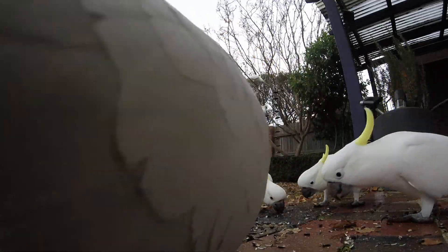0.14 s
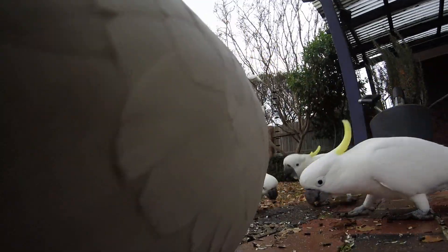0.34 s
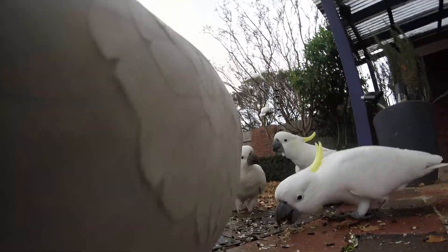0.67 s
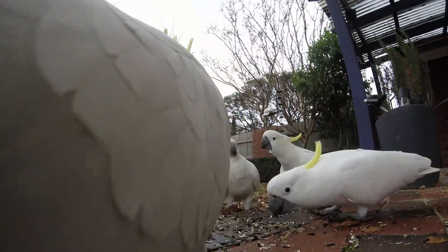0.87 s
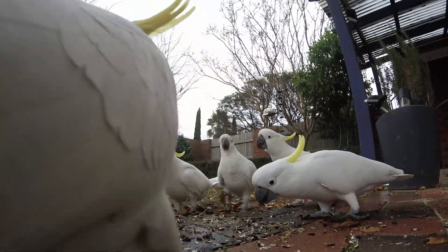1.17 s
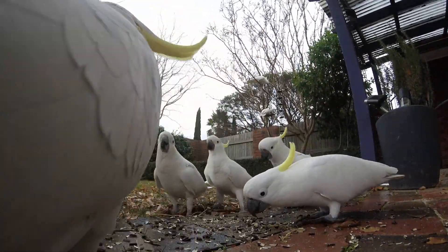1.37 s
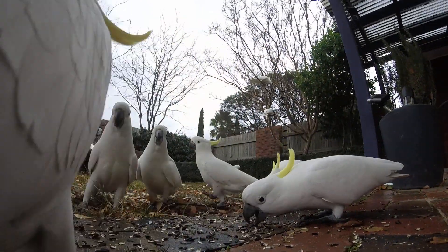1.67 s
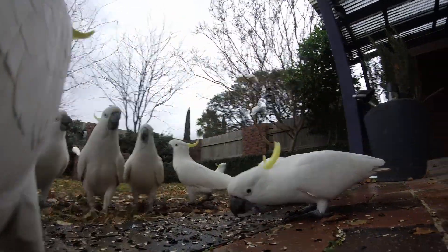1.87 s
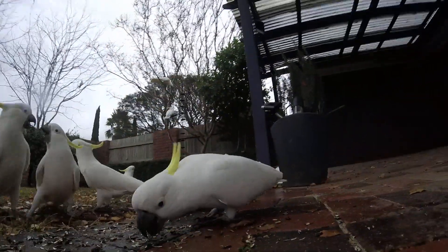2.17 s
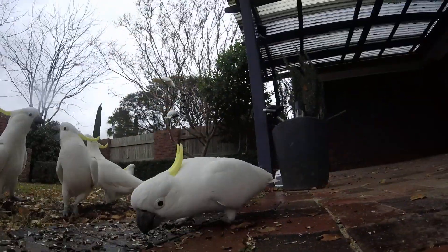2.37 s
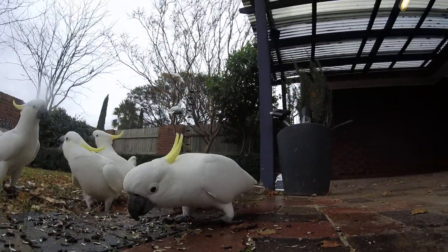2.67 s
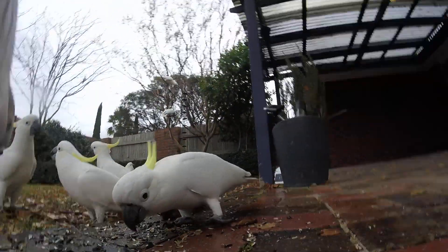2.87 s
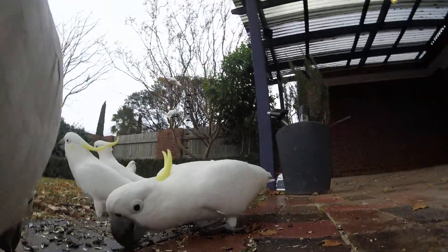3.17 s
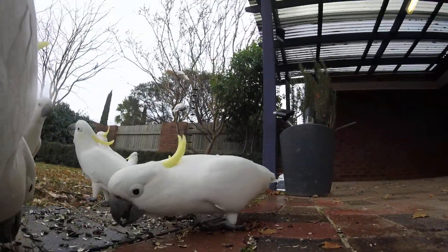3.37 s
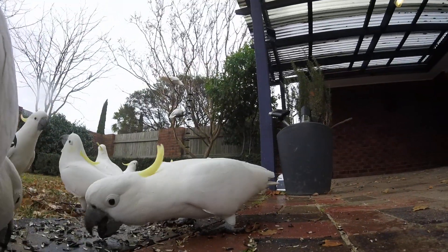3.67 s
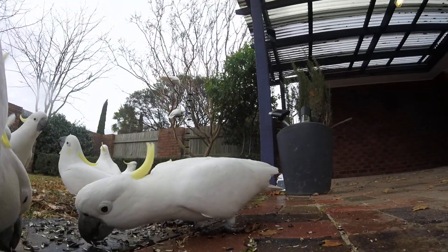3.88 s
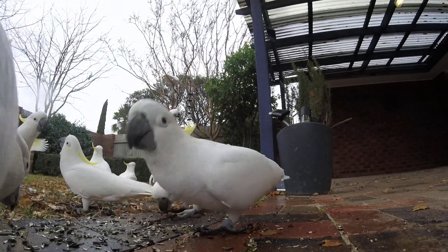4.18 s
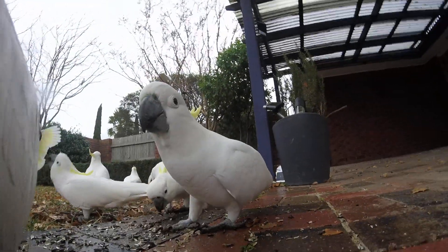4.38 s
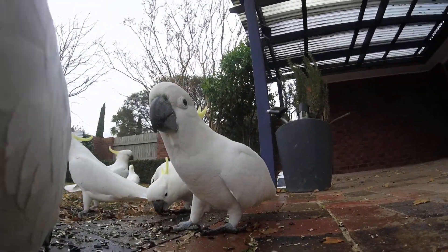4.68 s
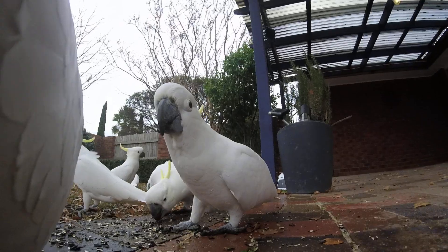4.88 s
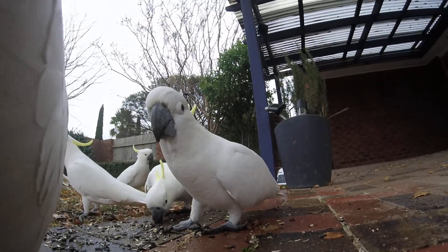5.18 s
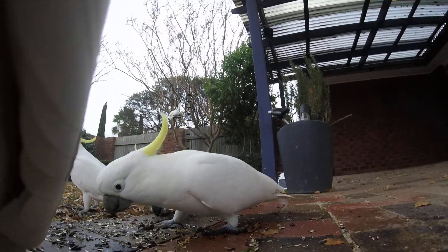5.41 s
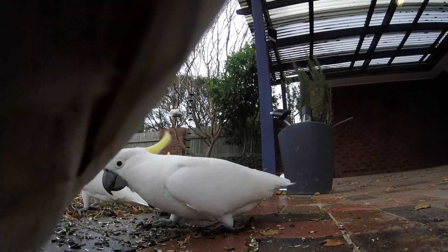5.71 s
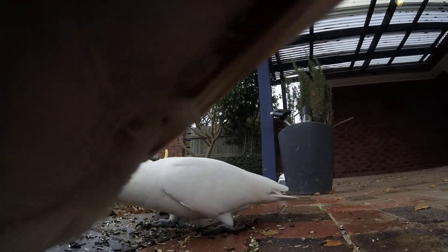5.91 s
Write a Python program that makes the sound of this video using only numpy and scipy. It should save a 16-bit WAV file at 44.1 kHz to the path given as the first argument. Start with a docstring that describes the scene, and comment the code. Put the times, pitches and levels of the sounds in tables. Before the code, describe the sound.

A quiet, steady, muffled hiss of garden air runs throughout, heard from inside a small sealed plastic housing on paving where large parrots feed. After near-stillness, faint taps and a light brush arrive at 0.4-0.7 s. At 0.87 s a loud, hard, hollow plastic knock lands with a low thump, followed by small clicks. Little ticks lead to rubbing at 1.6 s and a second loud knock at 1.72 s. From about 1.9 to 2.4 s comes the busiest passage: continuous gritty scuffing with rattling taps, bright husk cracks and dull bumps. A lighter knock follows at 2.65 s, sharp short scrapes at 3.0-3.3 s, and a bumpy tap near 3.36 s. Then it thins: small taps at 3.5-3.8 s, a lull, soft scratchy strokes with crisp ticks at 4.4-4.7 s, a low bump at 4.9 s, faint brushing and clicks around 5.0-5.4 s, and gentle thuds at 5.6 and 5.87 s.

```python
"""A steady muffled hiss comes first: garden air through the sealed plastic housing of a small camera.
Large parrots feeding on seed on wet paving then knock and rub it: beaks and feet excite its modes
by impact, feathers and grit by random slips. Husks crack nearby as very short impulses, and hops
and rocking of the camera are low damped oscillations. The hiss is noise shaped by a spectrum."""
import sys
import numpy as np
from scipy import signal
from scipy.io import wavfile
from scipy.ndimage import uniform_filter1d

SR = 44100
rng = np.random.default_rng(int(sys.argv[2]) if len(sys.argv) > 2 else 0)


def boost(x):
    """Linear amplitude factor 10**(x/20) for a level x in decibels (scalar or array-like)."""
    u = np.asarray(x, float) / 20
    return 10 ** u


def master_out(mix):
    """Clip the mix to full scale and print it as 16-bit PCM to the path in sys.argv[1]."""
    frames = np.transpose(np.atleast_2d(mix))
    ceiling = np.clip(frames, -1, 1)
    pcm = np.round(ceiling * 32767).astype(np.int16)
    wavfile.write(sys.argv[1], SR, pcm)


N = 266805  # length in samples

# Modes of the housing walls in flexure: f/Hz, relative level/dB, t60/s
WALL_MODES = [(440, 3.5, 0.042), (471, 6, 0.016), (578, -17, 0.056), (1048, 0, 0.014)]
# Modes of the back shell: f/Hz, relative level/dB, t60/s
SHELL_MODES = [(790, -25.5, 0.008), (865, -8.5, 0.021), (1155, -5, 0.061), (1373, 6.5, 0.04),
               (1594, 6, 0.012), (1802, 6, 0.011), (1957, 5, 0.015)]
# Modes of the door and lens port: f/Hz, relative level/dB, t60/s
PORT_MODES = [(2160, 7.5, 0.021), (2426, 12.5, 0.019), (2723, 14.5, 0.013), (3217, 17, 0.0038),
              (3414, 9.5, 0.011), (3680, 1, 0.012), (4020, -5, 0.02), (4120, 0, 0.016)]
# Modes of the mount, lurching and flexing: f/Hz, relative level/dB, t60/s
MOUNT_MODES = [(62, 8, 0.045), (256.3, 0, 0.039), (278.5, -0.5, 0.071), (358, -6, 0.051), (600, -24, 0.092)]
# Blows on the housing: t/s, nominal peak level of the tap/dB,
# lean/dB (positive weakens the back shell, negative the port), nominal peak level of the mount's lurch/dB
KNOCKS = [(0.3958, -46, -1, -45), (0.5469, -40, -18, -32.5), (0.5612, -34, -3, -36.5),
          (0.5852, -37, -1, -60), (0.5988, -42, -3, -49), (0.8681, -11.5, -4, -7), (0.9104, -44, -16, -37),
          (0.9247, -35, -14, -64), (0.9324, -28, -13.5, -65), (0.956, -59, 4, -29), (0.9714, -34, -19, -31),
          (0.9893, -44, -2, -59), (1.484, -53, 4, -39.5), (1.61, -44, 1, -60), (1.636, -31, -10, -63),
          (1.718, -10.5, 1.5, -12), (2.019, -55, 0, -43), (2.083, -31, -4, -21.5), (2.091, -44, -3, -26),
          (2.1165, -26, 7, -57), (2.1409, -20.5, 4.5, -34), (2.187, -29, -1, -53), (2.272, -29.5, 0, -30.5),
          (2.285, -20, -14, -41), (2.3104, -23.5, -14, -35), (2.3276, -26, 6, -28.5),
          (2.628, -48, 0, -33.5), (2.6492, -34.5, -8.5, -23.5), (2.945, -47.5, -1, -39),
          (2.9669, -39, -8, -38.5), (3.0713, -30.5, -20, -48), (3.091, -27.5, 29, -46),
          (3.275, -43, 1, -45), (3.344, -42, -23, -38), (3.3561, -30.5, -3, -21), (3.368, -46, -1, -31.5),
          (3.4884, -44, -3.5, -60), (3.5203, -44.5, 1, -63), (3.728, -42, 2, -45), (3.7562, -40, -4, -27),
          (3.7954, -55, 5, -32.5), (4.3786, -42, 7, -58), (4.5182, -35, -3, -58), (4.8908, -38, -5, -24),
          (5.026, -57, 0, -43), (5.091, -48, 3, -64), (5.224, -41, -2, -60), (5.2385, -44, 3, -51),
          (5.2594, -28.5, 1.5, -62), (5.347, -48, 2, -69), (5.593, -44, -6, -32), (5.614, -34.5, -5.5, -27),
          (5.745, -46, -10, -62), (5.841, -43.5, -5, -69), (5.867, -47, -4, -27)]


def knocks():
    """Impact excitation: each blow drives shell and port, flexes the walls and lurches the mount."""
    s, tap_db, lean_db, lurch_db = np.transpose(KNOCKS)
    # the walls flex most when a blow is both sharp and heavy
    wall_db = 9 + 1.48 * tap_db + 0.91 * lurch_db
    shell_db = tap_db - np.maximum(lean_db, 0)
    port_db = tap_db + np.minimum(lean_db, 0)
    contact = dict(chatter_s=0.004, chatter=0.06)
    shell = strike(s, shell_db, ring(SHELL_MODES, 0.00015, 0.000077), **contact)
    port = strike(s, port_db, ring(PORT_MODES, 0.00037, 0.000097), **contact)
    walls = strike(s, wall_db, ring(WALL_MODES, 0.00013, 0.002), chatter_s=1, chatter=0)
    # the mount follows 0.34 ms later
    mount = strike(s + 0.00034, lurch_db, ring(MOUNT_MODES, 0.0017, 0.00012), chatter_s=1, chatter=0)
    return shell + port + walls + mount


def strike(times, peak_db, shape, chatter_s, chatter):
    """Linear superposition: impulses with a random contact chatter are convolved with a modal response."""
    blows = np.zeros(N + 400)
    fade = np.exp(-np.arange(400) / (SR * chatter_s))
    for s, db, noise in zip(times, peak_db, rng.standard_normal((len(times), 400))):
        contact = chatter * noise * fade
        contact[0] = 1
        blows[round(s * SR):][:400] += boost(db) * contact / np.linalg.norm(contact)
    return signal.oaconvolve(blows, shape)[:N]


def ring(modes, push_s, rise_s):
    """Modal synthesis: damped cosines of alternating sign, swelling in after a smooth push; peak 1."""
    t = np.arange(SR // 2) / SR
    free = np.zeros(len(t))
    for k, (hz, db, t60) in enumerate(modes):
        free += (-1) ** k * boost(db - 60 * t / t60) * np.cos(2 * np.pi * hz * t)
    push = np.sin(np.pi * np.clip(t[:500] / push_s, 0, 1)) ** 2
    swelling = free * (1 - np.exp(-t / rise_s))
    shape = signal.oaconvolve(swelling, push)[:len(t)]
    return shape / abs(shape).max()


# Modes of the latch and buttons: f/Hz, relative level/dB, t60/s
FITTING_MODES = [(5030, 6, 0.0026), (5970, -7, 0.012), (6450, -4, 0.016), (7390, -6, 0.0089),
                 (8500, -2, 0.0036), (9410, -4, 0.005), (11100, -3.5, 0.003), (14400, -5, 0.002)]
# Judder of the body dragged on the paving: f/Hz, relative level/dB, t60/s
JUDDER_MODES = [(40, 2.5, 0.15), (58, 0, 0.05), (100, 0, 0.22), (152, 1, 0.15)]
# Touch of each rubbing stroke, relative to the port: back shell level/dB, fittings level/dB,
# weight on the mount/dB, f/Hz where the fittings sing most
TOUCH = [(5, -18.5, 14, 7100), (2.5, -8, -14, 18000), (0, -14.5, 14.5, 7400), (12.5, -12, 14.5, 6400),
         (1, -8, 15.5, 8200), (6.5, -11, 18, 6100), (-4, -16.5, -12, 5500), (2.5, -17.5, 13, 5700),
         (-1.5, -17, 0.5, 6900), (-2.5, -19, 2.5, 8000), (-5, -20, -3.5, 8000), (-2, -29, 18.5, 6400),
         (4, -34, 14, 6400), (-9, -15.5, 1.5, 11400), (0.5, -17.5, 2.5, 11400), (-10.5, -15, -10, 11400),
         (-1, -4, 8.5, 5800), (2, -8.5, -1.5, 5700), (-5.5, -9.5, 0, 6200), (-3, -7.5, 10, 7800)]


def rubbing():
    """Random slip excitation: dense slips sound in the treble, sparse ones shake the mount."""
    catch = np.clip(wander(size=300), -2, 2)  # shared fluctuation of grip
    shell_db, fine_db, weight_db, sing_hz = np.transpose(TOUCH)
    # dB per octave: the balance of fittings and shell tilts the port modes
    lean_db = 20 + 0.84 * fine_db - 0.87 * shell_db
    shell = scrape(SHELL_MODES, 0.00045, shell_db, per_s=2000, spread_db=1.5, grip=boost(0.54 * catch),
                   drift_db=2.0, sing_db=11, sing_hz=1694)
    port = scrape(PORT_MODES, 0.00034, 0, per_s=3800, spread_db=1.0, grip=boost(0.99 * catch),
                  drift_db=2.5, tilt_db=lean_db)
    fittings = scrape(FITTING_MODES, 0.00005, fine_db, per_s=8000, spread_db=0.0, grip=boost(1.2 * catch),
                      drift_db=-1.5, tilt_db=-0.6, sing_db=10, sing_hz=sing_hz)
    judder = scrape(JUDDER_MODES, 0.00087, weight_db, per_s=1300, spread_db=-4.0, grip=1, drift_db=-1.0)
    mount = scrape(MOUNT_MODES[1:] + WALL_MODES, 0.00014, weight_db - 16.5, per_s=140, spread_db=2.5,
                   grip=boost(2.0 * catch), drift_db=7.0, sing_db=19, sing_hz=600)
    return shell + port + fittings + judder + mount


# Pressure along each rubbing stroke, one list a stroke: t/s, rms level raised in the port/dB
STROKES = [
    [(0.38, -76), (0.412, -67), (0.54, -66), (0.56, -52.5), (0.6, -57), (0.63, -72)],
    [(0.64, -62), (0.662, -61.5), (0.712, -56.5), (0.8, -67)],
    [(0.89, -49), (0.928, -62.5), (1.06, -66.5)],
    [(1.12, -69.5), (1.208, -76), (1.26, -95)],
    [(1.59, -75), (1.634, -54), (1.686, -53.5), (1.71, -54.5)],
    [(1.74, -48), (1.748, -73), (1.8, -69)],
    [(1.86, -64), (1.88, -50), (2.01, -46)],
    [(2.005, -46), (2.065, -46), (2.085, -41), (2.2, -40), (2.259, -42), (2.333, -39), (2.36, -45),
     (2.385, -58)],
    [(2.38, -57), (2.408, -52), (2.514, -59), (2.6, -62.5)],
    [(2.995, -58), (3.008, -46), (3.055, -50), (3.075, -38.5), (3.1, -46), (3.115, -46.5), (3.15, -59)],
    [(3.165, -52), (3.198, -41.5), (3.222, -55), (3.255, -48), (3.28, -52.5), (3.295, -77)],
    [(3.47, -86), (3.492, -66), (3.55, -71)],
    [(3.7, -64), (3.78, -67)],
    [(4.43, -58), (4.45, -55.5), (4.5, -60)],
    [(4.495, -54.5), (4.557, -47.5), (4.6, -56.5)],
    [(4.595, -51), (4.627, -45), (4.713, -60.5), (4.75, -78)],
    [(4.96, -65), (5.016, -64.5), (5.07, -68)],
    [(5.1, -68), (5.17, -57), (5.255, -60)],
    [(5.28, -62), (5.344, -60.5), (5.4, -64)],
    [(5.8, -68), (5.872, -55), (6.012, -68), (6.05, -66)],
]


def scrape(modes, rise_s, reach_db, per_s, spread_db, grip, drift_db, tilt_db=0, sing_db=0, sing_hz=1):
    """Stochastic modal excitation: random slips drive one part while its modal balance wanders."""
    t, level, lean_db, best_hz = np.arange(N) / SR, np.zeros(N), np.zeros(N), np.ones(N)
    each = np.zeros(len(STROKES))
    for rows, db, tilt, hz in zip(STROKES, reach_db + each, tilt_db + each, sing_hz + each):
        s, pressure_db = np.transpose(rows)
        edge = np.clip(np.minimum(t - s[0], s[-1] - t) / 0.0012, 0, 1)  # 1.2 ms ramps
        level += edge * boost(db + np.interp(t, s, pressure_db))
        lean_db[edge > 0], best_hz[edge > 0] = tilt, hz

    draw, size, sign = rng.random(N), rng.exponential(1, N), rng.standard_normal(N)
    happens = draw < per_s / SR
    slips = evened(grip * happens * sign * boost(spread_db * np.minimum(size, 4)))

    rings, shares = [], []
    for k, mode in enumerate(modes):
        hz, db, _ = mode
        rings.append((-1) ** k * ring([mode], 0.5 / hz, rise_s))  # pushed for half a period
        drift = drift_db * wander(size=2000)
        lean = lean_db * np.log2(hz / modes[0][0])
        sing = sing_db * np.exp(-(np.log2(hz / best_hz) / 0.12) ** 2)  # width in octaves
        shares.append(boost(db + drift + lean + sing))
    # dividing by the total leaves the stroke's level unchanged by the modal balance
    total = np.sqrt(sum((share * np.linalg.norm(r)) ** 2 for share, r in zip(shares, rings)))
    return sum(signal.oaconvolve(level * slips * share / total, r)[:N] for share, r in zip(shares, rings))


# Husks cracking: t/s, nominal peak level/dB
CRACKS = [(0.8684, -44), (0.9328, -44), (1.3857, -48), (1.49, -52), (1.5145, -49), (1.6352, -45),
          (1.6776, -48), (1.7175, -39), (2.1151, -36), (2.144, -35), (2.2428, -40), (2.2802, -44),
          (2.3087, -39), (2.3271, -32.5), (2.5795, -48), (2.6324, -48), (3.0126, -45), (3.0689, -55),
          (4.3794, -41), (4.4069, -51), (4.5386, -42.5), (4.5805, -35.5), (4.6927, -48), (5.0115, -44.5),
          (5.25, -49), (5.3467, -36.5)]


def cracks():
    """Impulse response: the very short snap of a husk is heard in the modes of the small fittings."""
    s, snap_db = np.transpose(CRACKS)
    return strike(s, snap_db, ring(FITTING_MODES, 0.0001, 0.00031), chatter_s=0.0007, chatter=0.2)


# Hops of the camera on the paving: t/s, peak level/dB, f/Hz (which depends on how it sits)
HOPS = [(0.514, -28.5, 71.5), (0.560, -25, 159.4), (0.8692, -13, 81.5), (0.91, -22.5, 84.3),
        (0.959, -48, 95), (1.486, -35.5, 148), (1.643, -25, 144), (1.7188, -18, 85), (1.915, -38, 138),
        (2.02, -27.5, 99), (2.092, -21.5, 100), (2.145, -23, 123), (2.165, -25, 95), (2.271, -20.5, 106),
        (2.6492, -26, 63), (2.663, -31, 116), (2.971, -35, 130), (3.084, -33.5, 133), (3.137, -36.5, 128),
        (3.235, -36.5, 77), (3.343, -32, 189), (3.3548, -25, 74), (3.366, -24.5, 129), (3.512, -32, 100),
        (3.737, -40, 127), (3.756, -39, 121), (4.89, -40, 108), (4.915, -34.5, 70), (5.592, -36.5, 160),
        (5.6142, -30, 106), (5.63, -29, 62), (5.654, -33.5, 100), (5.8641, -41, 100), (5.895, -36, 79.6)]
# Rocking of the camera after a shove: t/s, peak level/dB, f/Hz, t60/s
ROCKS = [(0.398, -42.5, 36.7, .4), (0.559, -41, 40, 0.26), (0.585, -36.5, 30, 0.57),
         (0.957, -25.5, 45.5, 0.65), (1.642, -30.5, 43.6, 0.46), (1.7189, -31.5, 43.6, 0.82),
         (1.915, -47, 40, .3), (2.018, -40, 40, 0.31), (2.145, -40, 40, 0.2), (2.272, -52, 40, .25),
         (2.649, -41.5, 33.2, 0.36), (2.971, -39, 30, 0.48), (3.083, -40, 29.4, 0.56),
         (3.236, -38.5, 33, 0.6), (3.357, -31.5, 27.6, 0.41), (3.7933, -32.5, 38.7, 0.33),
         (4.437, -42, 26, 0.65), (4.901, -25.5, 41.6, 0.29), (5.096, -42.5, 25, 0.22),
         (5.6124, -28.5, 26.7, 0.42), (5.8646, -35.5, 35.6, 0.34), (5.9, -32, 37, 0.33)]


def jolts():
    """Damped oscillation: each hop dies quickly, each rocking motion more slowly."""
    out = np.zeros(N)
    hops = [(s, db, hz, 0.085, 0.0047, 0.0012) for s, db, hz in HOPS]
    rocks = [(*row, 0.0045, 0.0015) for row in ROCKS]
    for s, db, hz, t60, push_s, rise_s in hops + rocks:
        part = out[round(s * SR):][:SR // 2]
        part += boost(db) * ring([(hz, 0, t60)], push_s, rise_s)[:len(part)]
    return out


# Spectrum of the air heard through the shell: f/Hz, relative spectral density level/dB
AIR = [(15, -70), (25, 1.5), (91, 2), (330, -5), (630, -10), (1490, -13), (2060, -16), (3340, -19),
       (9030, -30.5), (12500, -37.5), (15500, -42)]


def air():
    """Spectrally shaped noise: random short-time spectra with faint patches make the garden wash."""
    frames, hz = N // 256 + 5, np.fft.rfftfreq(1024, 1 / SR)
    real, imaginary, patches = rng.standard_normal((frames, 513, 3)).T
    patches = uniform_filter1d(patches, size=12, axis=0)  # across frequency
    patches = evened(uniform_filter1d(patches, size=14, axis=1))  # across time
    f, db = np.transpose(AIR)
    spectrum_db = np.interp(np.log(hz + 1), np.log(f), db)[:, None]
    z = (real + 1j * imaginary) * boost(spectrum_db + 1.7 * patches)
    wash = signal.istft(z, nperseg=1024, noverlap=768)[1][:N]
    return boost(-56) * evened(wash)  # rms level in dB


def wander(size):
    """Low-pass noise: twice-averaged random numbers drift slowly, with rms 1."""
    once = uniform_filter1d(rng.standard_normal(N), size=size)
    return evened(uniform_filter1d(once, size=size))


def evened(x):
    """Normalisation: scales to rms 1."""
    return x / np.sqrt(np.mean(x ** 2) + 1e-20)


def scene():
    """Superposition: all the sources add at the one microphone in the housing."""
    return (knocks() + jolts() + cracks() + rubbing() + air())[None]


def low_pass(x):
    """Removes everything above the highest recorded frequency."""
    return signal.sosfilt(signal.butter(12, 15610, fs=SR, output="sos"), x)


def record(dry):
    """Peak-hold compression after a 22 Hz low cut: gain falls only if held power exceeds -10 dB."""
    cut = signal.sosfilt(signal.butter(1, 22, "high", fs=SR, output="sos"), dry)
    power_db = 10 * np.log10(abs(uniform_filter1d(cut[0] ** 2, size=400)) + 1e-12)
    fall = np.arange(N) * 13.0 / SR  # the held level falls by 13 dB/s
    held_db = np.maximum.accumulate(power_db + fall) - fall
    over_db = np.maximum(held_db + 10, 0)
    late_db = signal.lfilter([1 / 400], [1, 1 / 400 - 1], over_db)  # lags by about 9 ms
    finished = cut / boost(0.19 * late_db)
    return low_pass(finished)


dry = scene()
out = record(dry)
master_out(out)
```